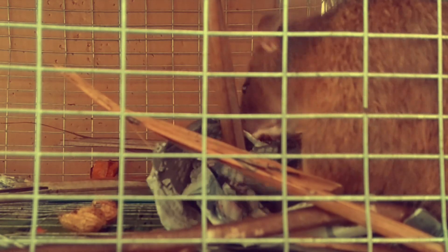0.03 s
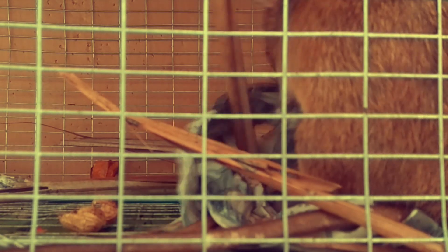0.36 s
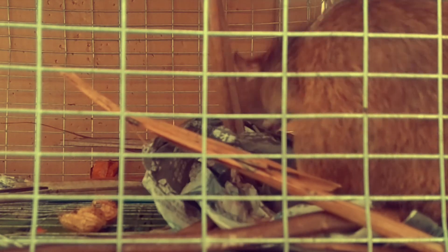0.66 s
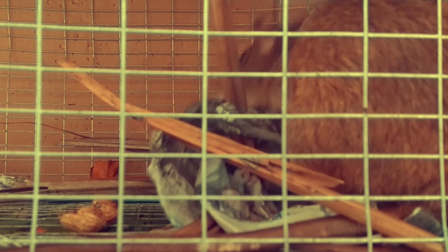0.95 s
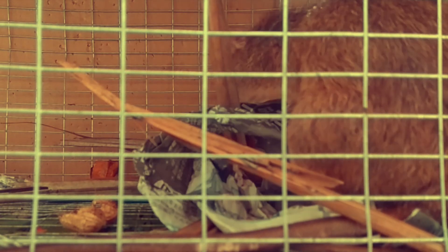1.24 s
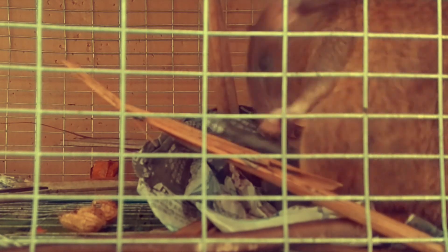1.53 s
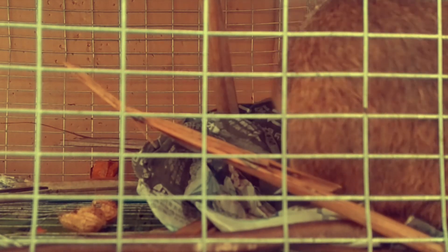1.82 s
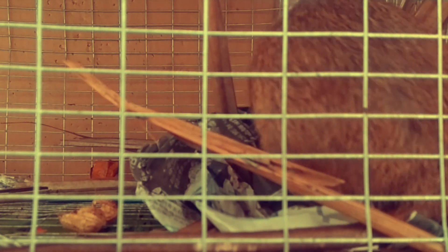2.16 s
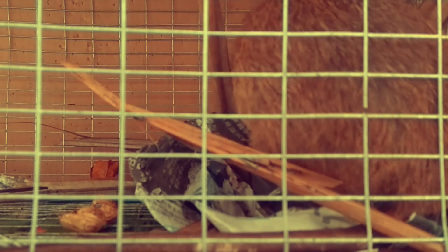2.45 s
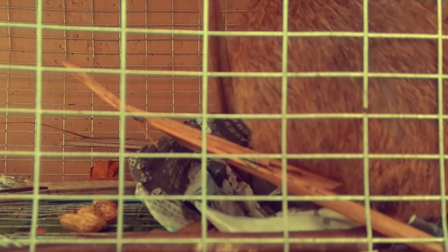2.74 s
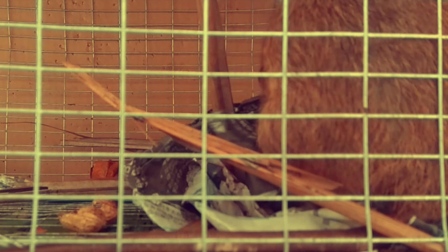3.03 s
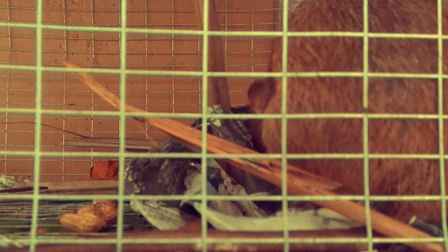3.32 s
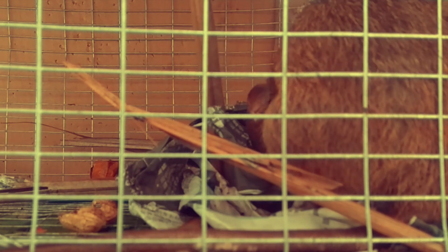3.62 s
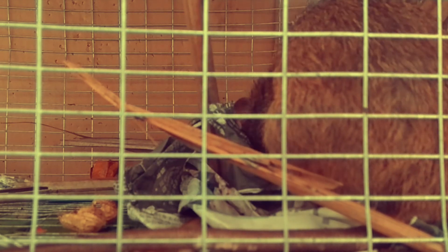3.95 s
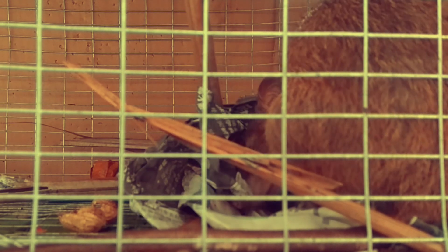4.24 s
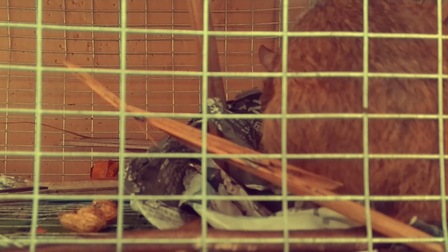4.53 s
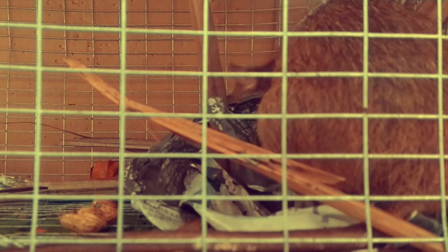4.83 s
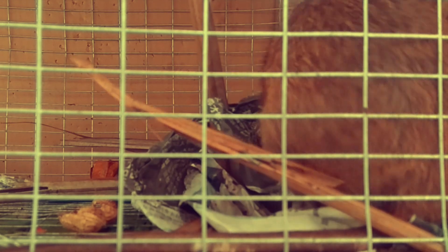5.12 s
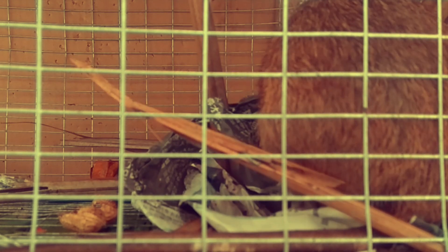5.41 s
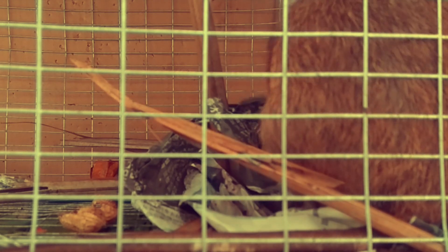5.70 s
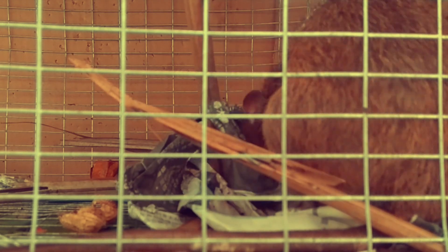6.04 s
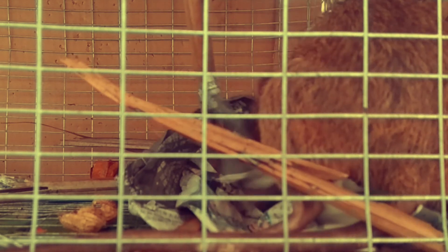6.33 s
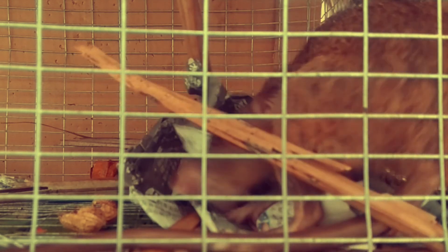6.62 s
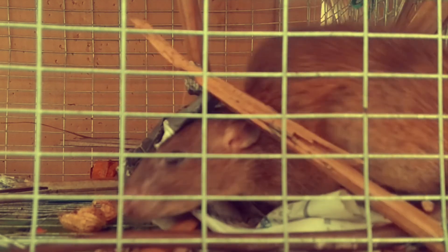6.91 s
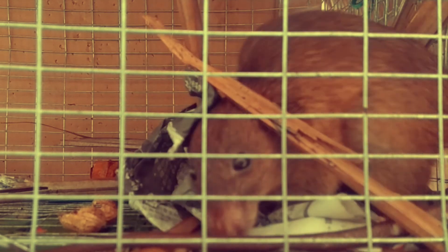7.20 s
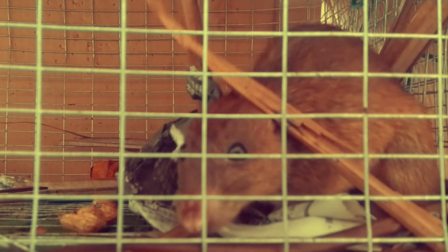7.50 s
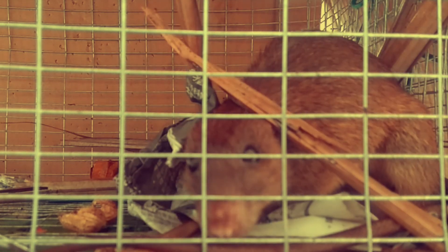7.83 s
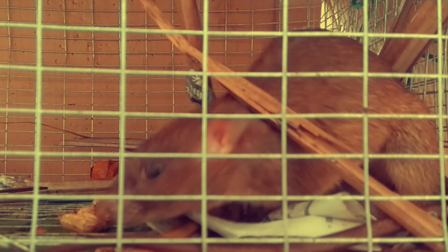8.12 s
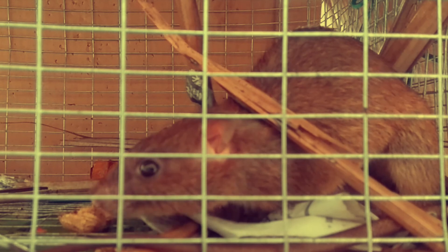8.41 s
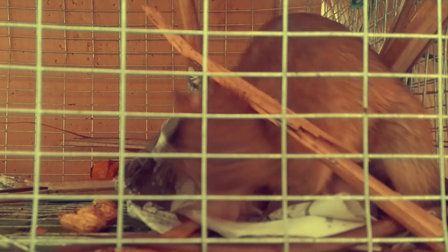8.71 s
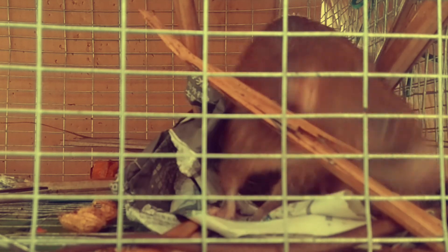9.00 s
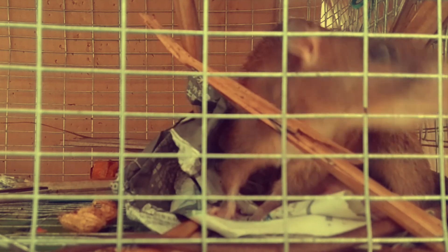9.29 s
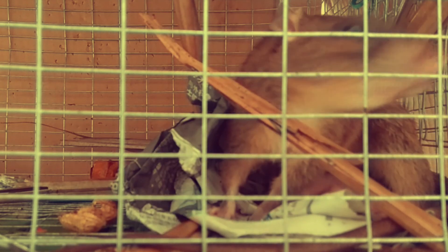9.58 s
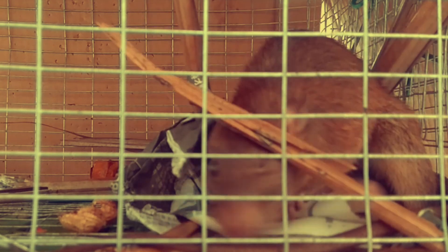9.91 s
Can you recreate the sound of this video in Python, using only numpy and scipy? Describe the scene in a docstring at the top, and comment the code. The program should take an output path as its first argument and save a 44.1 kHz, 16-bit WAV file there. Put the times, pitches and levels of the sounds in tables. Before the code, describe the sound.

Rat pups cry very close to the microphone in a small wooden cage with an almost silent background. Hoarse rasps, two soft thumps and a rustle open the first half second. From 0.5 seconds, high whistling squeals repeat about three to four times a second, each brief, arching in pitch and ending roughly. The loudest, before 2 seconds, crackle slightly. The squeals continue more softly, sounding squeezed and muffled from 3.5 to 4.7 seconds, pause briefly, then resume from 5.2 to 6.8 seconds. An adult rat moves throughout, with scattered dry rustles and tiny snaps of paper bedding. Its dull bumps on the floor grow busier from 5.6 seconds, with the strongest thud and a cluster of rustles around 7 seconds. After that the pups give only faint, short rasps and whimpers among more bumps. A loose wooden slat knocks sharply at about 9.6 seconds, followed by a last rustle.

```python
"""Rat pups in a wooden cage.

Pups squeal in a nest of rags and paper, about three times a second, then tire into hoarse whimpers.
Each squeal is an arched harmonic whistle that breaks up as the air runs out.
The adult shifts about on top of them: it covers their mouths, rustles the bedding and bumps the cage.
The pups are very close, and the loudest squeals clip and crackle."""
import sys
import numpy as np
from scipy import signal
from scipy.fft import rfft, irfft, next_fast_len
from scipy.io import wavfile
from scipy.ndimage import uniform_filter1d, minimum_filter1d, map_coordinates

SR = 44100
rng = np.random.default_rng(int(sys.argv[2]) if len(sys.argv) > 2 else 0)


def generate_wav(signal):
    """Clip the signal to [-1, 1] and save it as 16-bit WAV at the path in sys.argv[1]."""
    frames = np.transpose(np.atleast_2d(signal))
    scaled = np.clip(frames, -1, 1) * 32767
    pcm = np.round(scaled).astype(np.int16)
    wavfile.write(sys.argv[1], SR, pcm)


N = 438794
SIDES = np.array([[.5], [-.5]])  # splits a left-minus-right difference


def amp(db):
    """Decibels to gain."""
    return 10 ** (np.asarray(db) / 20)


def unit(x):
    """Scale to rms 1."""
    return x / np.sqrt(np.mean(x ** 2) + 1e-20)


def along(points, hz):
    """Interpolate (f/Hz, value) points on a log axis."""
    f, v = np.transpose(points)
    return np.interp(np.log(np.abs(hz) + 1), np.log(f + 1), v)


def wobble(rate_hz, n):
    """Smooth random curve, rate_hz knots a second."""
    knots = rng.standard_normal(int(n * rate_hz / SR) + 4)
    return map_coordinates(knots, [np.arange(n) * rate_hz / SR])


def filtered(x, response):
    """Apply a complex frequency response."""
    n = x.shape[-1]
    m = next_fast_len(n + 4096)
    return irfft(rfft(x, m) * response(np.fft.rfftfreq(m, 1 / SR)), m)[..., :n]


def band_limit(hz, cutoff_hz=15600):
    """Steep low-pass gain."""
    return 1 / np.sqrt(1 + (hz / cutoff_hz) ** 120)


def noise(spectrum, n):
    """Coloured noise, rms 1."""
    return unit(filtered(rng.standard_normal(n), lambda hz: amp(along(spectrum, hz))))


def add(track, start_s, sound):
    """Mix a stereo sound into the track."""
    place = track[:, max(0, round(start_s * SR)):][:, :sound.shape[1]]
    place += sound[:, :place.shape[1]]


def scatter(sound, walls_db, t60_s=.19, lag_s=3e-5):
    """Close boards scatter a sound differently on its way to each microphone."""
    t = np.arange(SR // 30) / SR
    walls = rng.standard_normal((2, len(t))) * amp(-60 * t / t60_s) * (t > .0004)
    paths = amp(walls_db) * walls / np.linalg.norm(walls, axis=1, keepdims=True)
    paths[:, 0] = 1  # direct path
    pair = signal.fftconvolve(sound[None], paths / np.sqrt(1 + amp(walls_db) ** 2), axes=1)
    return filtered(pair, lambda hz: np.exp(2j * np.pi * hz * lag_s * SIDES))


# Air spectrum: f/Hz, level/dB
AIR_SPECTRUM = [(30, -18), (300, 8), (1000, -7), (8000, -5.5), (15000, -8.5)]


def still_air(level_db=-84):
    """Almost silent air, independent on each side."""
    return amp(level_db) * np.array([noise(AIR_SPECTRUM, N), noise(AIR_SPECTRUM, N)])


# Cage decay: f/Hz, t60/s
CAGE_DECAY = [(300, 0.51), (1000, .22), (2000, 0.25), (4000, 0.16), (9000, 0.2), (15000, 0.053)]
# Microphone balance: f/Hz, left minus right/dB
MIC_BALANCE = [(200, -7), (1300, -5.5), (4400, -1.5), (8100, -8.5), (10500, 1.5), (13000, 7.5)]


def cage(pair, tail_db=-19):
    """The wooden box adds a short tail; each microphone hears its own colour."""
    hz, t, bands = signal.stft(rng.standard_normal((2, SR // 2)), SR, nperseg=256)
    decay = amp(-60 * t / along(CAGE_DECAY, hz)[:, None])
    tail = signal.istft(bands * decay, SR, nperseg=256)[1]
    wet = signal.fftconvolve(pair, tail / np.linalg.norm(tail[0]), axes=1)[:, :N]
    return filtered(pair + amp(tail_db) * wet, lambda f: amp(SIDES * along(MIC_BALANCE, f)))


def fidgets(count=40, level_db=-57, spread_db=8, ring_hz=520, t60_s=.14, attack_s=.0033):
    """Small movements in the nest nudge the floor at random moments."""
    out, t = np.zeros((2, N)), np.arange(SR // 5) / SR
    for k, (when, softness, pitch) in enumerate(rng.random((count, 3))):
        ring = np.sin(2 * np.pi * ring_hz * 2 ** (pitch - .5) * t + 1.5 * wobble(160, len(t)))
        decay = amp(level_db - spread_db * softness - 60 * t / t60_s)
        nudge = decay * (1 - np.exp(-t / attack_s)) ** 2 * ring
        add(out, (k + when) * N / SR / count, scatter(nudge, walls_db=-3.5))
    return out


# Floor spectrum: f/Hz, level/dB
FLOOR_SPECTRUM = [(41, -57.5), (70, -59.5), (147, -3.5), (274, 4), (507, 0.5), (597, 1.5), (703, -6),
                  (787, -8.5), (1400, -42), (1820, -37.5), (3080, -120)]
# Paw and body blows: t/s, level/dB, ring f/Hz, left minus right/dB
FLOOR_BLOWS = [(0.052, -41, 614, 20.0), (0.284, -19.5, 383, -7.5), (0.386, -19, 333, 10),
               (1.007, -27, 575, 28.5), (1.784, -45.5, 595, 34.5), (3.697, -47, 337, 10.0),
               (3.837, -51, 630, 22.0), (4.112, -40.5, 562, 18.0), (4.656, -36, 652, 20.5),
               (5.649, -25.5, 293, -4), (5.839, -29.5, 279, -1.5), (6.215, -18, 449, -9.5),
               (6.732, -30, 268, 10.5), (6.966, -27.5, 640, 0), (7.038, -11.5, 331, 2.5),
               (7.12, -18.5, 496, -3.5), (7.502, -37.5, 223, -24.0), (7.822, -21.5, 306, 13),
               (7.932, -26, 268, 11), (8.021, -42, 260, -15.5), (8.43, -41, 513, 3), (8.768, -47, 574, 30),
               (9.159, -21, 403, -18), (9.794, -26.5, 677, 1)]
# Body drags: t/s, length/s, level/dB
FLOOR_DRAGS = [(.25, 0.083, -29.5), (5.622, 0.21, -44), (6.674, 0.23, -45.5), (6.922, 0.29, -31.5),
               (7.748, 0.13, -48)]


def floor(thud_db=-8, ring_db=-2, t60_s=.11, settle_s=.038, settle_db=-13, drag_db=-1, lean_db=3):
    """Soft blows ring the floor, each again as the weight settles; the body drags over it unevenly."""
    out, t = np.zeros((2, N)), np.arange(SR // 5) / SR
    # bedding cushions the blow and damps the boards
    envelope = (1 - np.exp(-t / .004)) ** 2 * amp(-60 * t / t60_s)
    for start_s, db, hz, pan_db in FLOOR_BLOWS:
        pan = amp(SIDES * np.clip(pan_db + lean_db, -12, 12))
        near_ring = lambda f: amp(-6 * np.log2((f + 1) / hz) ** 2)
        for delay_s, contact_db in [(0, 0), (settle_s, settle_db)]:
            thud = amp(thud_db) * unit(filtered(noise(FLOOR_SPECTRUM, len(t)), near_ring))
            ring = amp(ring_db) * np.sin(2 * np.pi * hz * t + wobble(70, len(t)))
            blow = amp(db + contact_db) * (thud + ring) * envelope
            add(out, start_s + delay_s, pan * scatter(blow, walls_db=-9, t60_s=.4))
    for start_s, length_s, db in FLOOR_DRAGS:
        n = int(length_s * SR)
        drag = unit(noise(FLOOR_SPECTRUM, n) * amp(5 * wobble(53, n))) * np.hanning(n)
        add(out, start_s, scatter(amp(db + drag_db) * drag, walls_db=2.5, t60_s=.084))
    return out


# Slat knocks: t/s, level/dB
SLAT_KNOCKS = [(9.576, -7), (9.585, -7.5)]
# Slat modes: f/Hz, level/dB, t60/s
SLAT_MODES = [(655, -12, 0.026), (850, -12, 0.029), (1070, -2.5, 0.028), (1230, -4.5, 0.056),
              (1382, -7, 0.044)]


def slat(attack_s=.0039):
    """A loose, light piece of wood hits and rebounds."""
    out, t = np.zeros((2, N)), np.arange(SR // 4) / SR
    for start_s, db in SLAT_KNOCKS:
        ring = sum(amp(mode_db - 60 * t / t60_s) * np.sin(2 * np.pi * hz * t + rng.uniform(0, 2 * np.pi))
                   for hz, mode_db, t60_s in SLAT_MODES)
        add(out, start_s, scatter(amp(db) * ring * (1 - np.exp(-t / attack_s)), walls_db=-2))
    return out


# Bedding spectrum: f/Hz, level/dB
BEDDING_SPECTRUM = [(710, -41.5), (1200, -24.5), (1570, -45), (1780, -21), (3110, -22.5), (3810, -5),
                    (6420, -7), (10700, 0.5), (15400, -3.5)]
# Strokes through the bedding: t/s, length/s, level/dB
BEDDING_STROKES = [(0.302, 0.17, -27.5), (2.048, 0.098, -33.5), (2.237, 0.079, -30), (3.177, 0.076, -18.5),
                   (3.751, 0.11, -31), (6.175, 0.076, -24), (6.445, 0.13, -34), (6.769, 0.099, -21.5),
                   (6.889, 0.13, -26.5), (7.002, 0.08, -22), (7.165, 0.077, -40.5), (7.47, 0.084, -24.5),
                   (8.741, 0.1, -33), (9.772, 0.11, -26.5)]
# Snaps of claws and dry bedding: t/s, level/dB, centre f/Hz
BEDDING_SNAPS = [(0.4199, -10.5, 11400), (1.0141, -25.5, 3680), (2.0692, -19, 9740), (4.0292, -15.5, 8640),
                 (6.2063, -14, 4287), (6.2502, -19, 3530), (6.567, -15.5, 11660), (6.8149, -15.5, 11290),
                 (7.0214, -16.5, 9860), (7.1861, -20, 5950), (8.5006, -37, 5500), (8.5724, -22.5, 8800),
                 (8.7564, -16, 7830), (9.2883, -23, 3470), (9.7961, -16.5, 4600)]


def bedding(grain_db=4, clump_db=2, snap_db=2, snap_t60_s=.048, snap_attack_s=.0012, skirt_db_oct=5):
    """Paper and straw: clumped grains under each stroke, and single sharp snaps."""
    out, t = np.zeros((2, N)), np.arange(SR // 12) / SR
    colour = lambda hz: amp(along(BEDDING_SPECTRUM, hz))
    for start_s, length_s, db in BEDDING_STROKES:
        n = int(length_s * SR)
        grains = rng.standard_normal(n) * amp(grain_db * wobble(1300, n) + clump_db * wobble(180, n))
        rustle = unit(filtered(grains, colour)) * signal.windows.tukey(n, .5)
        add(out, start_s, scatter(amp(db) * rustle, walls_db=-4.5, t60_s=.011))
    for start_s, db, centre_hz in BEDDING_SNAPS:
        focused = lambda hz: colour(hz) * amp(-skirt_db_oct * np.abs(np.log2((hz + 1) / centre_hz)))
        envelope = amp(db + snap_db - 60 * t / snap_t60_s) * (1 - np.exp(-t / snap_attack_s))
        snap = envelope * unit(filtered(rng.standard_normal(len(t)), focused))
        add(out, start_s, scatter(snap, walls_db=-10.5, t60_s=.027))
    return out


def whistle(length_s, hz, fall, rough):
    """One unsteady partial that swells quickly, falls in pitch and fades."""
    n = int(length_s * SR)
    u = np.arange(n) / n
    pitch_hz = hz * (1 + fall * (.5 - u)) * (1 + rough * (wobble(150, n) + wobble(700, n)))
    envelope = amp(3 * wobble(200, n)) * np.sin(np.pi * np.sqrt(u)) ** 2
    return np.sin(2 * np.pi * np.cumsum(pitch_hz) / SR) * envelope


# Voice spectra (in the open, under the adult, tired): f/Hz, level/dB
OPEN_VOICE = [(650, -66), (1100, -30), (1890, -20.5), (2260, -15), (2460, -13.5), (3790, -10.5),
              (4730, -11.5), (5110, -9.5), (5710, -24.5), (6170, -1), (6660, -14), (8590, 1.5),
              (9590, -11.5), (12800, -20), (15400, -24.5)]
COVERED_VOICE = [(650, -97), (1100, -88.5), (1480, -15.5), (1750, -12.5), (2020, -14), (2330, -29.5),
                 (2850, -35), (3040, -16), (3510, -3.5), (4010, -9), (4280, -16), (5220, -15.5),
                 (7280, -43.5), (10700, -3), (15400, -28.5)]
TIRED_VOICE = [(650, -96), (1100, -30), (1640, -6.5), (2280, -0.5), (2460, 3.5), (3280, -4.5), (3920, 0),
               (4630, -4.5), (5400, -5), (10500, -17.5), (11300, -34), (13500, -22), (15400, -39)]


def throat(hz, covered, tired, bright_db):
    """Gain of a pup's voice: a blend of three spectra, tilted about 5 kHz."""
    body_db = ((1 - covered - tired) * along(OPEN_VOICE, hz)
               + covered * along(COVERED_VOICE, hz) + tired * along(TIRED_VOICE, hz))
    tilt_db = bright_db * np.tanh(np.log((hz + 1) / 5000) / .35)
    return amp(body_db + tilt_db) * band_limit(hz)


def cry_pitch(t, length_s, pitches_hz, covered, scoop_s=.009, sag_s=.04):
    """An arch in Hz that dips under the adult's weight and sags once the air has run out."""
    u = t / length_s
    arch_hz = np.polyval(np.polyfit([.2, .5, .8], pitches_hz, 2), np.minimum(u, .88))
    scoop = 1 - .2 * np.exp(-t / scoop_s)
    squeezed = np.clip((covered - .5) / .15, 0, 1)
    dip = 1 - .12 * squeezed * np.exp(-((u - .55) / .16) ** 2)
    flick = 1 + .1 * np.clip((u - .84) / .16, 0, 1)
    sag = 1 - .25 * np.clip((t - .96 * length_s) / sag_s, 0, 1)
    waver = 1 + .011 * wobble(55, len(t))
    return arch_hz * scoop * dip * flick * sag * waver


def cry(length_s, pitches_hz, middle_db, swell_db, rough, covered, bright_db,
        attack_s=.022, release_t60_s=.093, dull_db_oct=3, flutter_db=2, partial_db=2.5, half_db=-5):
    """A harmonic whistle, hoarse while the vocal folds start and stop."""
    t = np.arange(int((length_s + .12) * SR)) / SR
    u, n = t / length_s, len(t)
    pitch_hz = cry_pitch(t, length_s, pitches_hz, covered)
    starting = np.clip(1 - u / .24, 0, 1)
    spent = np.clip((u - .76) / .25, 0, 1)  # air runs out: the voice dulls and breaks up
    hoarse = np.clip(rough + .7 * starting + .85 * spent, 0, 1)
    tremor = .007 * wobble(110, n) + .004 * wobble(300, n)
    lurch = .05 * wobble(130, n) + .04 * wobble(600, n)
    phase = 2 * np.pi * np.cumsum(pitch_hz * (1 + tremor + hoarse * lurch)) / SR
    tired = np.clip((-12.5 - middle_db) / 5, 0, 1) * (1 - covered)
    grid_hz = np.arange(0, SR / 2, SR / 1024)
    colour = throat(grid_hz, covered, tired, bright_db)

    def partial(k):
        """Each overtone swells and fades by itself, more so while the voice is hoarse."""
        drift_db = partial_db * (1 + hoarse) * wobble(68.35, n) - dull_db_oct * spent * np.log2(k)
        gain = np.interp(k * pitch_hz, grid_hz, colour) * amp(drift_db)
        return gain * np.sin(k * phase + rng.uniform(0, 2 * np.pi))

    tone = sum(partial(k) for k in range(1, 10))
    # strained folds alternate strong and weak cycles: lines halfway between harmonics
    tone += amp(half_db) * hoarse ** 2 * sum(partial(k + .5) for k in range(1, 6))
    steady = tone / np.sqrt(np.abs(uniform_filter1d(tone ** 2, SR // 25)) + 1e-12)
    # air hisses through the folds once a cycle
    puffs = rng.standard_normal(n) * (1 + np.cos(phase))
    hiss = unit(filtered(puffs, lambda hz: np.interp(hz, grid_hz, colour)))
    breath = .4 * hoarse ** 1.4
    voice = np.sqrt(1 - breath ** 2) * steady + breath * hiss
    fade_db = 3 * (1 - tired)  # a tired pup keeps pushing to the end
    effort_db = middle_db + np.interp(u, [.15, .5, .85], [fade_db - swell_db, 0, -fade_db - swell_db])
    release_db = -60 * np.maximum(t - .93 * length_s, 0) / release_t60_s
    onset = np.sin(np.pi / 2 * np.minimum(t / attack_s, 1)) ** 2
    return voice * amp(effort_db + flutter_db * wobble(150, n) + release_db) * onset


# Soft whimpers, no overtones: t/s, length/s, f/Hz, level/dB
PUP_WHIMPERS = [(4.676, 0.16, 1556, -35), (7.764, 0.14, 1667, -36), (9.067, 0.083, 1704, -35),
                (9.9, .055, 2020, -31.5)]
# Rasps, voice barely catching: t/s, length/s, f/Hz, level/dB
PUP_RASPS = [(0, 0.069, 1276, -14.5), (0.188, 0.19, 1231, -12.5), (0.34, .08, 1402, -24.5),
             (6.909, .09, 1549, -30.5), (7.49, .075, 2198, -28.5), (7.863, 0.054, 2206, -31.5),
             (8.021, 0.094, 2000, -27.5), (8.428, .096, 1664, -33.5), (9.232, .08, 2060, -34),
             (9.63, .095, 1850, -28)]
# Squeals: t/s, length/s, early, middle and late f/Hz, middle level/dB, swell/dB, rough/0-1, covered/0-1
PUP_SQUEALS = [(.517, .16, 1598, 1789, 1807, 0.5, 9.5, .06, 0.067),
               (.791, .165, 1736, 1819, 1680, -9.5, -2, .08, 0.014),
               (1.058, .15, 1860, 2075, 2008, 4, 13.5, 0.078, 0.062),
               (1.319, .142, 2155, 2251, 2051, 6.5, 13, .08, 0.14),
               (1.578, .155, 1895, 1922, 1970, -12.5, -7.5, .04, 0),
               (1.85, .15, 1886, 2065, 2038, 3.5, 11, 0.12, 0.025),
               (2.112, .127, 1867, 2012, 1968, -9, 0, 0.027, 0.093),
               (2.389, .175, 1762, 1990, 1943, -9, 1, .07, 0.16),
               (2.684, .135, 1947, 1975, 1812, -8, 2.5, 0.042, .13),
               (2.932, .15, 1844, 1902, 1760, -8, 0, .09, 0.17),
               (3.198, .15, 1701, 1805, 1849, -5.5, 4, .09, 0.23),
               (3.51, .123, 1866, 1926, 1824, -11.5, 2.5, 0.16, .68),
               (3.793, 0.13, 1930, 2020, 1999, -11, 2.5, .15, 0.67),
               (4.072, .13, 1942, 1880, 1950, -9.5, 5, .15, .65),
               (4.447, .22, 1821, 1733, 1652, -13.5, 0, 0.024, .82),
               (5.234, 0.062, 1844, 1983, 2004, -10.5, 1.5, .2, .5),
               (5.513, .105, 2508, 2214, 1861, -3.5, 8.5, 0.14, 0.11),
               (5.711, .147, 1683, 1720, 1700, -8, 2.5, .08, 0.19),
               (5.989, .122, 1588, 1643, 1536, -11, -0.5, 0.027, 0.31),
               (6.109, .08, 1548, 1810, 1918, -11, 0, 0.39, .18),
               (6.296, .13, 1625, 1556, 1457, -11, -0.5, 0.057, 0.42),
               (6.644, .15, 1453, 1639, 1480, -8, 11, .3, 0.67),
               (7.314, .058, 1820, 1727, 1832, -25.5, -0.5, 0.313, 0.11),
               (7.666, .094, 2369, 2075, 1852, -18.5, 0, 0.34, 0.3),
               (8.59, 0.083, 1417, 1537, 1604, -21.5, 5.5, 0.083, 0.41),
               (8.814, .11, 1713, 1635, 1550, -19.5, -1.5, 0.31, 0.29),
               (9.409, 0.075, 1585, 1765, 1817, -24, -2, .3, 0)]


def pups(level_db=-1, lead_s=.0055, chirp_hz=3050, chirp_db=-17, chirp_gap_s=.0011):
    """Squeals, rasps and whimpers; each squeal ends in a falling chirp as the mouth closes."""
    out = np.zeros((2, N))
    in_nest = lambda sound: scatter(sound, walls_db=-1, t60_s=.053)
    for start_s, length_s, *pitches_hz, db, swell_db, rough, covered in PUP_SQUEALS:
        squeal = cry(length_s + lead_s, pitches_hz, db, swell_db, rough, covered,
                     bright_db=1 + 3.5 * covered)
        add(out, start_s - lead_s, in_nest(squeal))
        chirp = whistle(.04, chirp_hz * (1 + .07 * rng.standard_normal()), fall=.33, rough=.06)
        add(out, start_s + length_s + chirp_gap_s, in_nest(amp(db - swell_db + chirp_db) * chirp))
    for start_s, length_s, hz, db in PUP_RASPS:
        pitches_hz = [.97 * hz, hz, .97 * hz]
        rasp = cry(length_s + lead_s, pitches_hz, db, swell_db=0, rough=.64, covered=.08, bright_db=1)
        add(out, start_s - lead_s, in_nest(rasp))
    for start_s, length_s, hz, db in PUP_WHIMPERS:
        add(out, start_s, in_nest(amp(db) * whistle(length_s, hz, fall=.047, rough=.05)))
    return amp(level_db) * out


def scene():
    """Pups and adult in the cage, over still air."""
    return still_air() + cage(pups() + floor() + fidgets() + slat() + bedding())


def suppress(pair, threshold_db=-82, corner_hz=2500):
    """A noise suppressor closes bands near or below a threshold that falls towards the bass."""
    hz, _, bands = signal.stft(pair, SR, nperseg=512)
    power = np.mean(np.abs(bands) ** 2, axis=0)
    threshold = amp(threshold_db) * hz / (hz + corner_hz)
    gain = power / (power + threshold[:, None] ** 2 + 1e-20)
    return signal.istft(bands * gain, SR, nperseg=512)[1][:, :N]


def record(dry, limit=1.35, clip=.97):
    """Suppressor, then a limiter on the loudest squeals; overshoot is clipped and the top is cut."""
    gated = suppress(dry)
    needed = 1 / np.maximum(np.abs(gated).max(axis=0) / limit, 1)
    gain = uniform_filter1d(minimum_filter1d(needed, size=SR // 150), size=SR // 150)
    return filtered(np.clip(gated * gain, -clip, clip), band_limit)


dry = scene()
out = record(dry)
generate_wav(out)
```